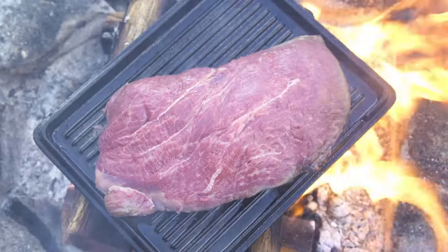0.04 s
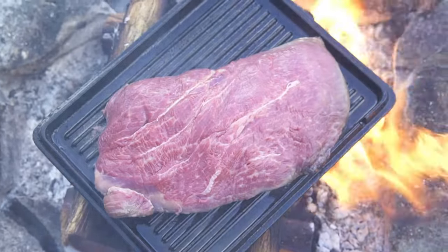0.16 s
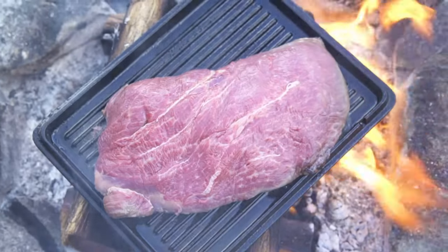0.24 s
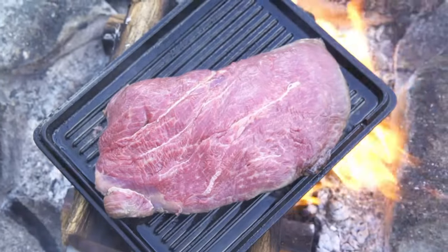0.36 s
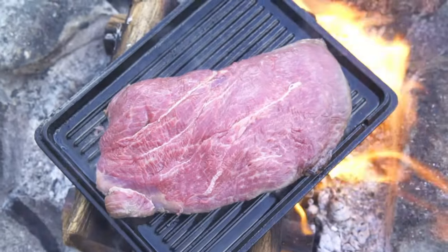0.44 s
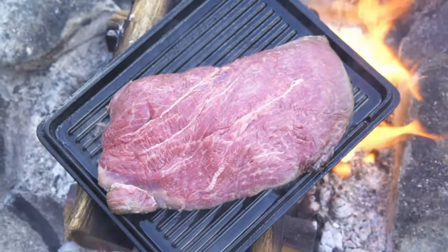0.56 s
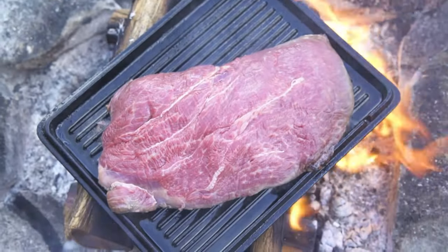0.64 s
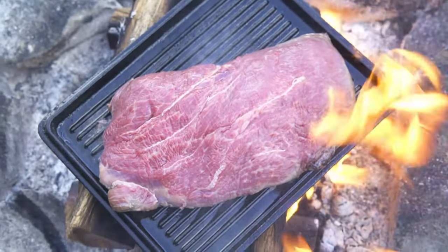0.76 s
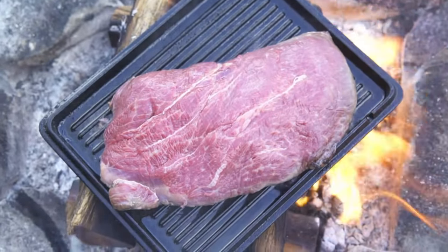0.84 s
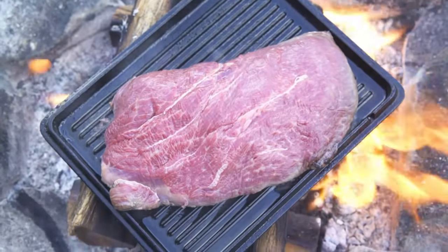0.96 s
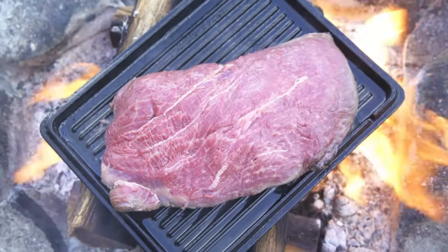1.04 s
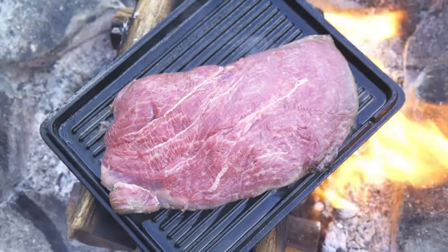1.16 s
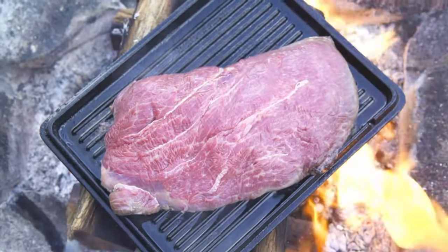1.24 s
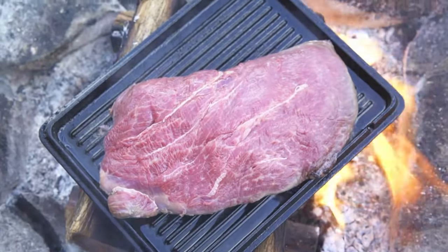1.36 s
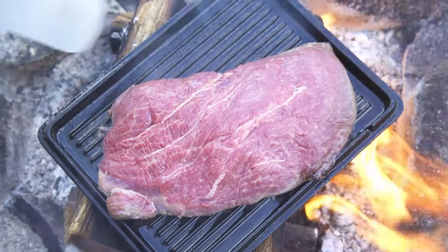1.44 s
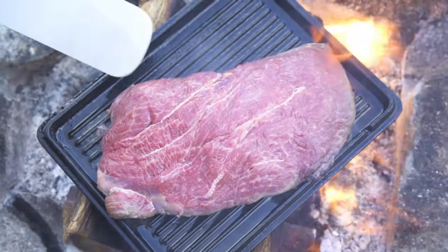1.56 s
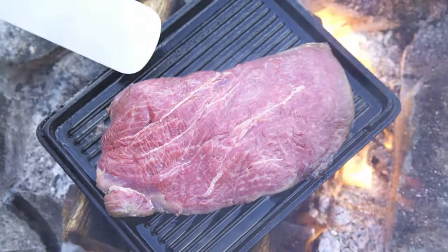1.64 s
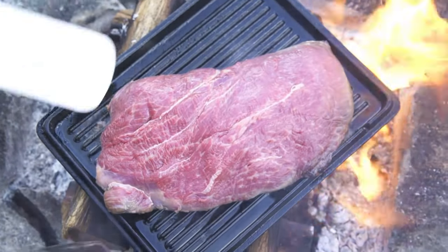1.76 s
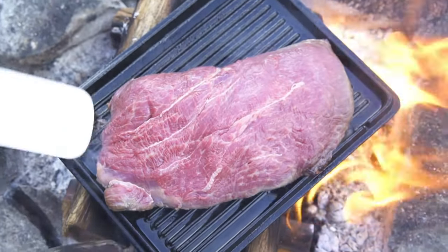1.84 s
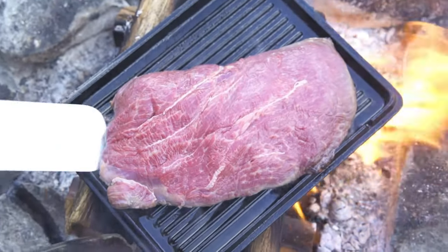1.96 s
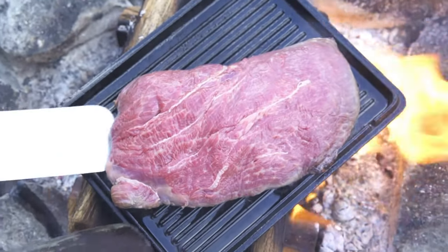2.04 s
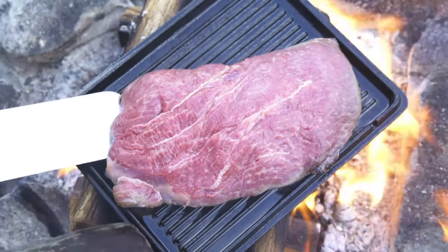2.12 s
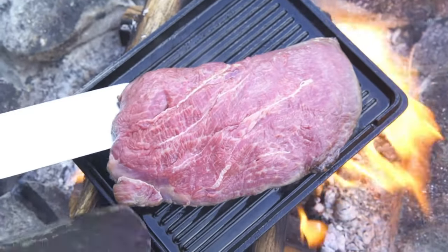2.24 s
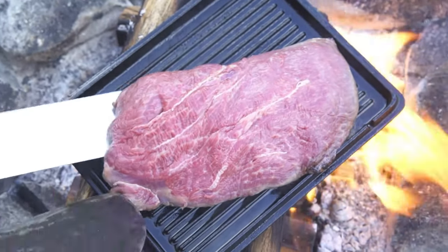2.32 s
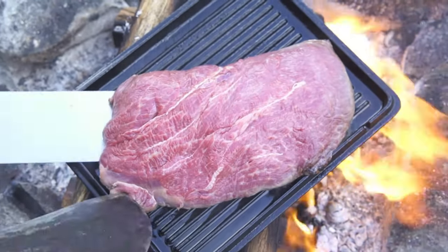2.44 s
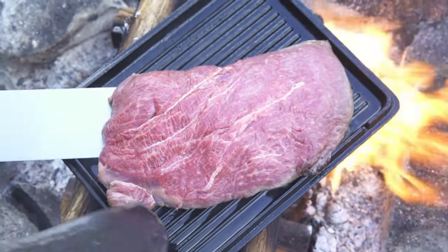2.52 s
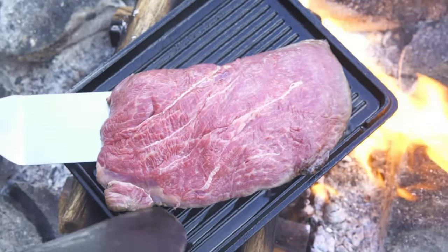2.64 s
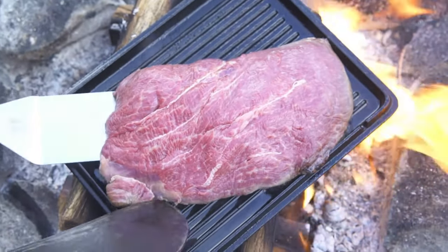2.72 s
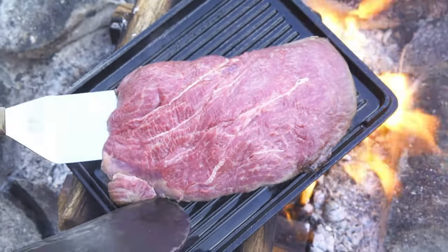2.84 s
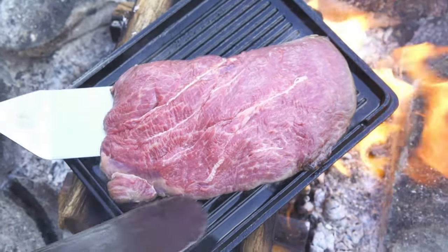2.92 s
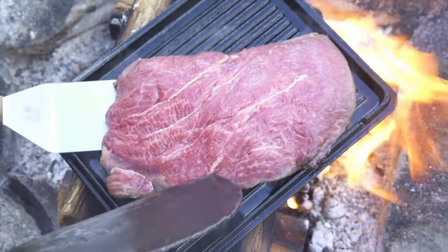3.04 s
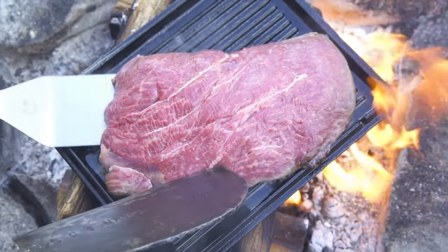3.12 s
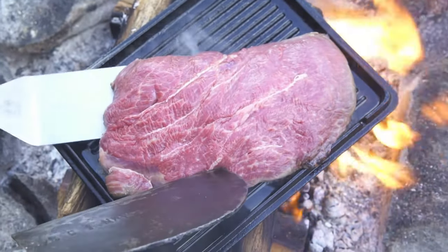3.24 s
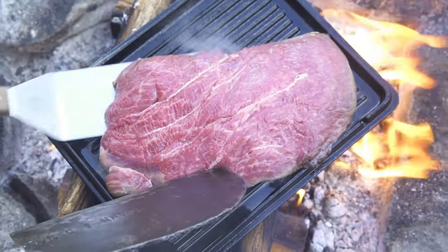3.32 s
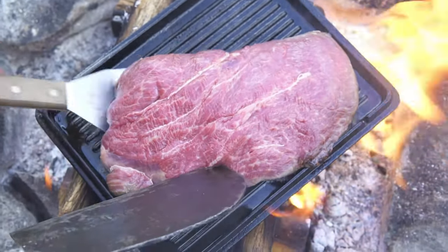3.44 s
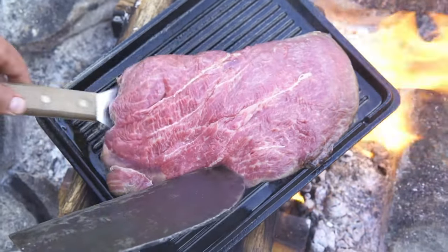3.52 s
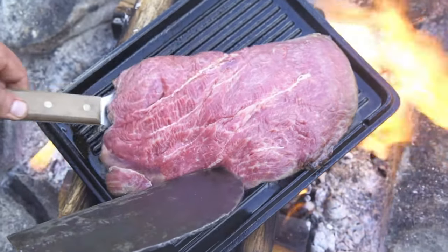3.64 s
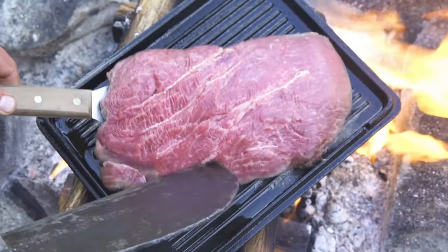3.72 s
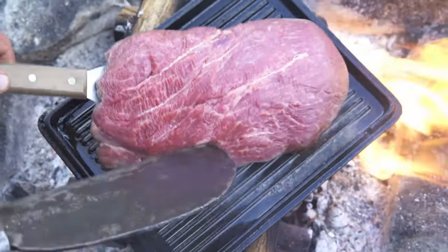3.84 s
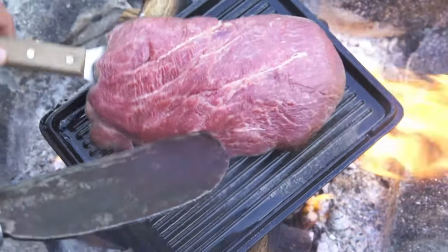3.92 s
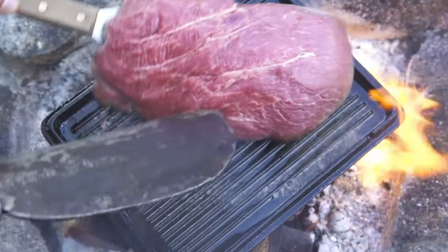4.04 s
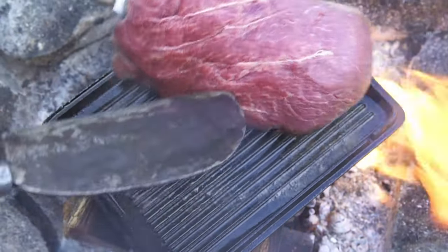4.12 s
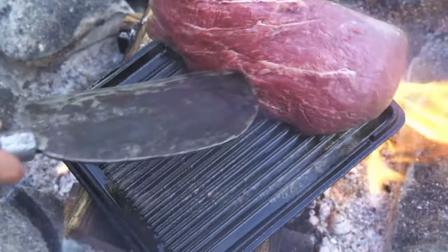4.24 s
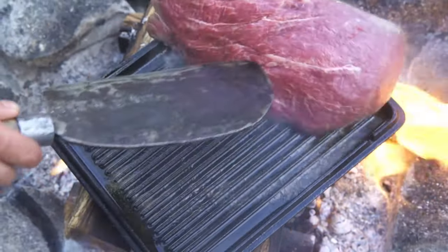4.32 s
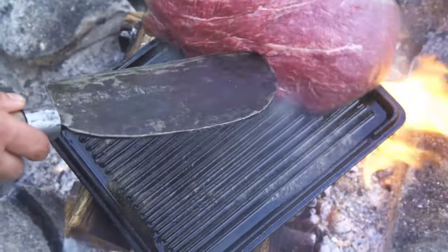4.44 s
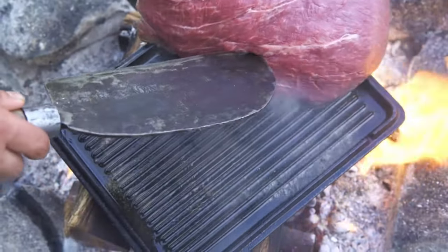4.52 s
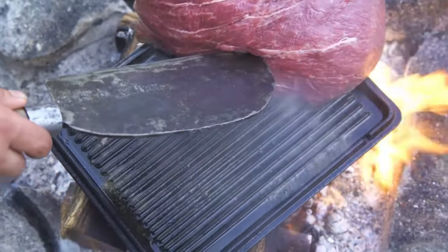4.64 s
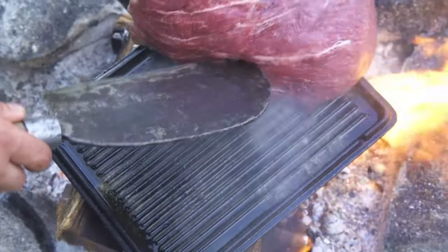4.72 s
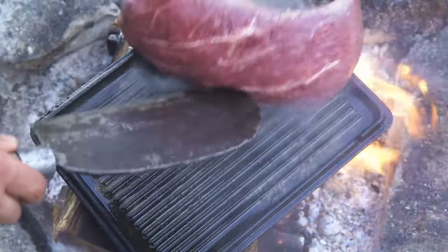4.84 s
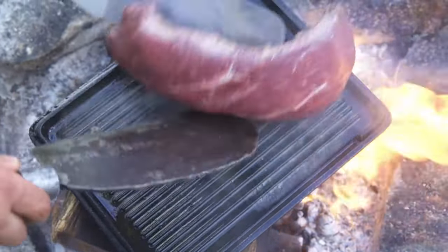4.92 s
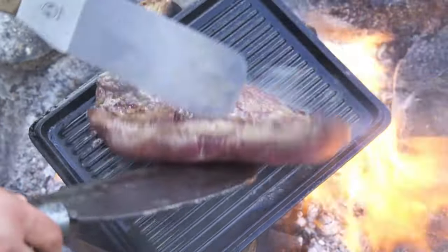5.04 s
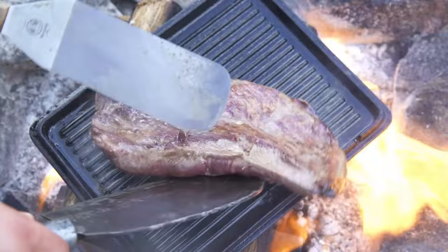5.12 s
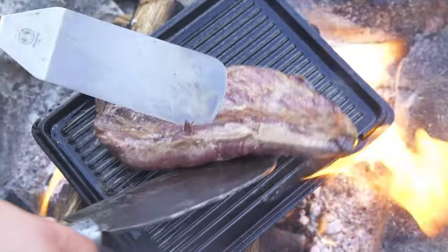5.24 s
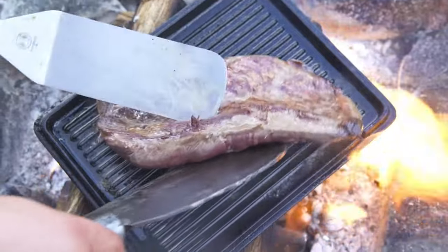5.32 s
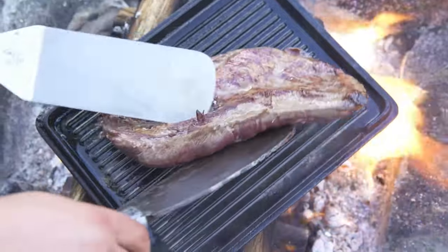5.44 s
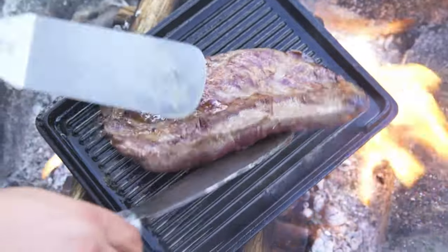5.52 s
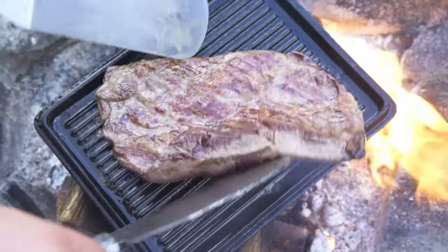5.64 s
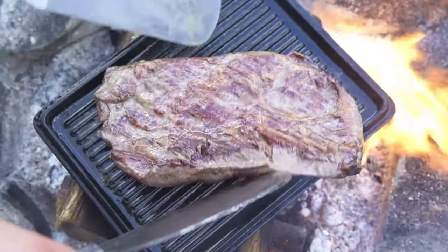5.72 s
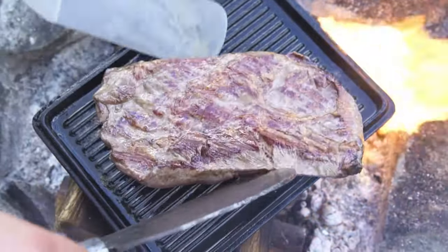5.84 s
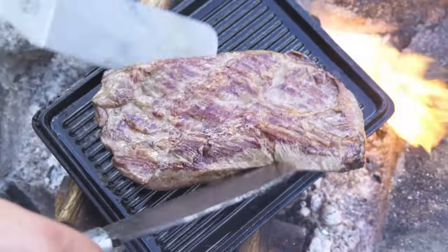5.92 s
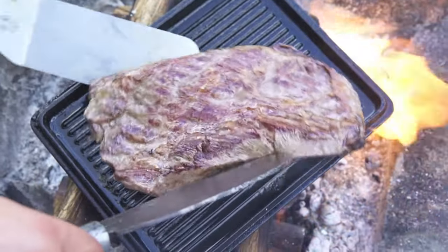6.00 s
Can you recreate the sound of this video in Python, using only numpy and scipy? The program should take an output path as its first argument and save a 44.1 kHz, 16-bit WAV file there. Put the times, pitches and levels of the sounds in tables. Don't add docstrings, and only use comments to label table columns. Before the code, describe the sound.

A close microphone in open air catches crisp frying: fine crackle, hissing spray and loud single spits over a soft, lumpy fire rumble. Soft wooden and metallic knocks lead to a gritty spatula scrape and a ringing tap, then a quick blade clatter and slide. After one especially loud pop, the turned meat hisses harder with short steam jets, and a second blade squeals faintly at the end.

```python
import sys
import numpy as np
from scipy import signal
from scipy.fft import rfft, irfft, next_fast_len
from scipy.io import wavfile
from scipy.ndimage import uniform_filter1d, map_coordinates

SR = 44100
rng = np.random.default_rng(int(sys.argv[2]) if len(sys.argv) > 2 else 0)


def pcm_store(signal):
    levels = np.round(np.clip(np.atleast_2d(signal), -1, 1) * 32767)
    wavfile.write(sys.argv[1], SR, levels.astype(np.int16).T)


def amplitude_ratio(level_db):
    exponent = np.asarray(level_db, float) / 20
    return 10 ** exponent


N = 267642

# (time [s], graininess [0-1], small-bubble pitch [Hz])
GRAIN = [(0, 0.92, 6700), (.8, 0.94, 6760), (1.3, 0.94, 6940), (1.7, 0.76, 6700), (1.9, 0.86, 6700),
         (3.2, 0.79, 6800), (3.9, 0.8, 7040), (4.3, 1, 7040), (4.75, 0.58, 8100), (5.1, 0.62, 6700),
         (5.4, 0.48, 7500), (5.8, 0.44, 6900), (6.07, 0.7, 6700)]


def unit(x):
    return x / np.sqrt(np.mean(x ** 2) + 1e-20)


def curves(rows):
    s, *cols = np.transpose(rows)
    return [np.interp(np.arange(N) / SR, s, c) for c in cols]


def wobble(rate):
    knots = rng.standard_normal(N // 200)
    return map_coordinates(knots, [np.arange(N) * min(rate, 200) / SR])


def filtered(x, response):
    m = next_fast_len(N + SR // 2)
    return irfft(rfft(x, m) * response(np.fft.rfftfreq(m, 1 / SR)), m)[:N]


def coloured(x, points):
    f, db = np.transpose(points)
    return unit(filtered(x, lambda hz: amplitude_ratio(np.interp(np.log(hz + 1), np.log(f), db, -120, -120))))


def resonance(modes):
    def response(f):
        return sum((-1) ** k * amplitude_ratio(db) * 1j * f * width / (hz * hz - f * f + 1j * f * width)
                   for k, (hz, width, db) in enumerate(modes))
    return response


def patchy(depth_db):
    z = signal.stft(rng.standard_normal(N + 512), nperseg=512)[2]
    field = rng.standard_normal(z.shape)
    for axis in (0, 1):
        field = uniform_filter1d(field, size=8, axis=axis)
    return signal.istft(z * amplitude_ratio(depth_db * unit(field)), nperseg=512)[1][:N]


def bursts(s, gain, hz, t60, phase, size, attack=2e-5):
    t = np.arange(size) / SR
    decay = gain[:, None] * amplitude_ratio(-60 * t / t60[:, None])
    wave = decay * np.sin(2 * np.pi * hz[:, None] * t + phase[:, None])
    wave = wave * -np.expm1(-t / attack)
    at = np.round(s * SR).astype(int)[:, None] + np.arange(size)
    return np.bincount(at.ravel(), wave.ravel(), N + SR)[:N]


def grains(count, centre_hz, cycles, spread_db):
    u = rng.random((count, 4))
    hz = np.clip(centre_hz * np.exp(0.88 * (u[:, 1] - u[:, 2])), 300, 0.4 * SR)
    size = amplitude_ratio(np.minimum(-np.log(1 - u[:, 3]), 1.4) * spread_db)
    raw = bursts(u[:, 0] * N / SR, size, hz, 4.95 * cycles / hz, 9 * u[:, 2], size=96)
    return unit(signal.lfilter([1, -1.4, 0.7], [1], raw))


def puffs(s, db, t60, top_hz):
    blow = bursts(s, amplitude_ratio(db), 0 * s, t60, np.pi / 2 + 0 * s, size=4000, attack=0.0017)
    return filtered(blow * rng.standard_normal(N), lambda f: 1 / (1 + 1j * f / top_hz) ** 2)


def fire():
    # (time [s], level [dB])
    flames = [(.1, -51), (.36, -53.5), (.68, -46), (.86, -53.5), (1.0, -48.5), (1.27, -42.5), (1.54, -50.5),
              (1.78, -46), (2.02, -53), (2.74, -50.5), (3.4, -53.5), (3.9, -51), (4.45, -46), (5.0, -45),
              (5.5, -44), (6.07, -45)]
    # (time [s], level [dB])
    draught = [(.1, -50.5), (.55, -46.5), (.85, -50), (1.27, -45), (2.6, -45), (3.9, -48), (4.55, -46),
               (5.4, -49.5), (5.8, -49.5), (5.92, -46), (6.05, -53)]
    # (frequency [Hz], level [dB per Hz])
    flutter_spectrum = [(15, -31), (30, -9.5), (70, -2), (130, -2.5), (220, -8.5), (400, -13.5), (700, -18)]
    roar_spectrum = [(90, -41), (200, -6), (400, -4.5), (750, -8.5), (1200, -5), (2000, -5), (3200, -16.5),
                     (6000, -45)]
    (flutter_db,), (roar_db,) = curves(flames), curves(draught)
    flutter = unit(amplitude_ratio(2.25 * wobble(9)) * coloured(patchy(depth_db=0.5), flutter_spectrum))
    embers = grains(count=900, centre_hz=1300, cycles=3.1, spread_db=4)
    roar = coloured(patchy(depth_db=1.5) + 0.22 * embers, roar_spectrum)
    roar = unit(amplitude_ratio(0.72 * wobble(15) + 1.17 * wobble(60)) * roar)
    return amplitude_ratio(flutter_db) * flutter + amplitude_ratio(roar_db) * roar


def knocks():
    # (time [s], peak [dB], pitch [Hz], t60 [s])
    contacts = [(.208, -29, 800, .012), (.231, -34.5, 980, 0.034), (.228, -35, 262, 0.052),
                (.478, -33.5, 326, 0.1), (1.082, -26, 1710, .01), (1.113, -26, 1020, 0.032),
                (1.113, -28.5, 535, 0.022), (1.178, -38, 430, .07), (1.198, -37.5, 424, 0.12),
                (1.263, -34, 564, .03), (1.272, -33, 480, .03), (1.281, -27, 1500, 0.016),
                (1.294, -34, 1050, .03), (1.174, -36, 1000, .04), (1.245, -30.5, 420, 0.049),
                (1.26, -30, 1430, 0.034), (1.273, -31, 900, 0.038), (1.684, -29.5, 305, 0.095),
                (2.328, -15.5, 1880, 0.01), (2.513, -28, 900, .035), (2.513, -30, 1250, .03),
                (2.538, -32, 1150, 0.037), (2.569, -30, 1010, 0.03), (2.569, -32, 420, .04),
                (2.61, -33, 430, 0.035), (2.757, -35, 503, 0.039), (3.114, -33.5, 228, 0.071),
                (3.209, -41, 491, 0.21), (3.965, -49, 174, .08), (4.004, -29.5, 215, 0.044),
                (4.423, -28.5, 423, 0.018), (4.424, -29, 850, .012), (5.348, -36, 700, 0.046),
                (5.638, -34, 1200, .02), (1.114, -32, 760, .02), (4.422, -33, 190, .035),
                (4.441, -27, 1500, .015), (4.463, -32, 520, .02), (1.11, -36, 298, .03),
                (1.245, -40, 200, 0.055)]
    s, db, hz, t60 = np.transpose(contacts)
    body = bursts(s, amplitude_ratio(db), hz, t60, 0 * s, size=6000, attack=0.00048)
    neighbour = bursts(s, amplitude_ratio(db - 27), 1.4 * hz, 0.44 * t60, 0 * s, size=6000)
    return body + neighbour + puffs(s, db + 2.5, 0.63 * t60, top_hz=900)


def struck(s, db, modes, damping, attack):
    hz, level_db, t60 = np.transpose(modes)
    level_db = level_db + 1.5 * rng.standard_normal(len(hz))
    return bursts(s + 0 * hz, amplitude_ratio(db + level_db), hz, t60 / damping, hz, size=9000, attack=attack)


def pressure(strokes):
    edge_db_per_s = 330
    t = np.arange(N) / SR
    gain = 0
    for touch, lift, db, swell_db in strokes:
        swell = swell_db * np.clip((lift - t) / (lift - touch), 0, 1)
        outside_s = np.maximum(0, np.maximum(touch - t, t - lift))
        gain = gain + amplitude_ratio(db - swell - edge_db_per_s * outside_s)
    return gain


def spatula():
    # (time [s], peak [dB], damping factor [1])
    taps = [
        (2.1055, -20.5, 1.22),
        (2.129, -24, 2),
        (3.434, -32.5, 1.6),
    ]
    # (time [s], peak [dB])
    clash = [
        (3.194, -27),
        (3.1955, -24),
        (3.2, -28),
        (3.205, -35),
        (3.2415, -27),
        (3.244, -29),
        (3.249, -31),
    ]
    # (frequency [Hz], level [dB], t60 [s])
    blade = [(673, -14.5, 0.17), (1195, -7, 0.32), (1374, 0.5, 0.21), (1838, 1, 0.094), (2280, 1, 0.25),
             (2790, -15, 0.15), (3400, -2.5, 0.11), (3750, -17, .1), (4660, -2, 0.086)]
    pair = [(1275, -2, 0.018), (2250, 1, 0.017), (2923, 7, 0.018), (3760, 7, 0.028), (4700, 4, .018),
            (5620, 2, .014), (6700, 4, .012)]
    # (touch [s], lift [s], level at lift [dB], swell along it [dB])
    scrapes = [
        [(1.832, 1.842, -43, -2), (1.856, 1.9, -42.5, 4), (1.91, 1.948, -32, 6)],
        [(2.37, 2.39, -41, 0), (2.525, 2.62, -41, -7.5)],
        [(3.36, 3.603, -42.5, 2.5)],
        [(5.545, 5.555, -46.5, 3), (5.905, 6.005, -42.5, -0.5)],
    ]
    # (frequency [Hz], width [Hz], level [dB])
    drag = [(800, 33, -2.5), (1390, 62, -2.5), (1880, 25, -1), (2200, 60, 4), (2900, 46, -2.5),
            (3180, 68, 2), (3870, 60, -3), (4170, 50, -17), (4860, 53, 2)]
    under = [(433, 180, -2), (1180, 250, 0.5), (1710, 300, -2.5), (2080, 180, 4.5), (2900, 350, -13)]
    slide = [(710, 33, -7), (1200, 47, -3), (1387, 80, -0.5), (1870, 100, 2.5), (2320, 170, -18)]
    knife = [(700, 22, -3.5), (1220, 23, -22), (1820, 38, -3), (2330, 120, -11), (2760, 49, -6)]

    out = sum(struck(s, db - 5.5, blade, damping, attack=0.0016) for s, db, damping in taps)
    out += sum(struck(s, db - 5.5, pair, 0.88, attack=0.0002) for s, db in clash)
    tap_s, tap_db, _ = np.transpose(taps)
    clash_s, clash_db = np.transpose(clash)
    out += puffs(tap_s, tap_db + 4, 0.054 + 0 * tap_s, top_hz=2500)
    out += puffs(clash_s, clash_db + 11, 0.011 + 0 * clash_s, top_hz=6000)

    for strokes, modes, rough in zip(scrapes, (drag, under, slide, knife), (0.1, 0.6, 0.7, 0.2)):
        grit = rng.standard_normal(N) * amplitude_ratio(4.3 * wobble(190))
        rasp = unit(filtered(grit, resonance([(2600, 3800, 0)])))
        ringing = unit(filtered(grit, resonance(modes)))
        out += pressure(strokes) * unit(ringing + rough * rasp)

    squeal_hz, squeal_db = 697, -5
    squeal = np.sin(2 * np.pi * squeal_hz * np.arange(N) / SR + 0.4 * wobble(30))
    return out + pressure(scrapes[-1]) * amplitude_ratio(squeal_db + 1.5 * wobble(40)) * squeal


def jets():
    # (time [s], length [s], pitch [Hz], width [Hz], level [dB])
    gaps = [(0.296, 0.037, 5560, 2500, -35), (3.358, 0.048, 7300, 1500, -33),
            (4.118, 0.024, 7400, 900, -34.5), (4.25, 0.14, 8000, 700, -39), (3.953, .12, 7000, 700, -39.5),
            (4.66, 0.1, 7960, 900, -34), (5.196, 0.048, 3920, 500, -31), (5.255, 0.0089, 8200, 1500, -25.5),
            (5.37, 0.044, 8200, 900, -28.5), (5.424, 0.017, 6200, 1200, -28), (5.5, 0.028, 8250, 800, -34),
            (5.61, 0.033, 6800, 2500, -31.5), (5.658, 0.055, 3900, 700, -31),
            (5.715, 0.027, 5000, 3000, -39), (2.443, 0.18, 9400, 4000, -37.5),
            (3.768, 0.049, 7000, 1500, -37), (1.383, 0.092, 8200, 1200, -44),
            (4.447, 0.089, 8300, 700, -39.5), (5.963, 0.11, 3480, 1000, -36.5)]
    t = np.arange(N) / SR
    sputter = rng.standard_normal(N) * amplitude_ratio(3.0 * wobble(190))
    out = np.zeros(N)
    for s, length, hz, width, db in gaps:
        hiss = unit(filtered(sputter, resonance([(hz, width, 0)])))
        out += amplitude_ratio(db) * np.exp(-((t - s) / length) ** 2) * hiss
    return out


def pops():
    # (time [s], peak [dB], pitch [Hz])
    drops = [(.076, -16.5, 2600), (.5005, -15.5, 4480), (.6127, -14, 5170), (.6725, -13, 4100),
             (.9216, -13, 3900), (1.3461, -14, 4350), (1.5, -14.5, 2200), (1.8262, -10.5, 3930),
             (2.038, -9, 3640), (2.015, -16, 3000), (2.0992, -20, 4330), (2.3792, -9, 4320),
             (2.6027, -10, 4540), (2.6232, -9.5, 4320), (2.6446, -12.5, 3270), (2.7965, -10, 4750),
             (2.9472, -11, 3660), (3.1953, -11.5, 2760), (3.4477, -12.5, 3440), (3.8558, -11, 3270),
             (4.12, -12.5, 3450), (4.2624, -12.5, 5300), (4.5749, -5, 4330), (4.5749, -12, 5300),
             (4.151, -19, 3000), (4.2003, -15, 3600), (4.302, -16, 4000), (4.385, -20, 2800),
             (4.425, -15, 3800), (4.435, -19, 3500), (4.465, -14, 3400), (4.503, -17, 2800),
             (4.28, -15.5, 4600), (1.8275, -13, 7600), (1.8555, -21, 4700), (3.944, -18, 4300),
             (1.0302, -15, 5200), (.866, -22, 3500), (.891, -22, 3200), (4.6256, -12.5, 4090),
             (4.8215, -13.5, 4260), (4.896, -13.5, 3750), (5.018, -12.5, 3400), (5.2284, -8.5, 3930),
             (5.713, -12, 3600), (5.857, -13, 3480),
             (.1987, -12, 8500), (.249, -11.5, 6030), (.4113, -15, 7110), (0.505, -13, 8830),
             (0.655, -10, 8400), (.6672, -14, 7840), (.8818, -12.5, 7800), (.896, -12, 7620),
             (1.0055, -13, 7620), (1.03, -13.5, 8740), (1.36, -11.5, 6980), (1.488, -10.5, 8230),
             (2.389, -8, 6500), (2.618, -12, 6100), (2.695, -8.5, 7670), (2.7209, -13, 8010),
             (2.8077, -10, 6060), (2.821, -11, 7940), (3.3434, -12, 6420), (3.4813, -12, 7450),
             (3.5146, -7.5, 7800), (3.669, -11, 6330), (3.711, -7, 6660), (4.078, -11, 7880),
             (4.107, -11, 7400), (4.2796, -17, 7500), (4.4866, -14, 7340), (5.0612, -10.5, 7340),
             (5.3895, -7.5, 8480), (.272, -15, 6500),
             (0.08, -26, 11400), (0.0851, -20, 4300), (0.092, -24, 9800), (0.1218, -21, 8300),
               (0.144, -18, 5300), (0.1887, -25, 9300), (0.2085, -17, 11700), (0.244, -17, 5900),
               (0.2793, -19, 6200), (0.2828, -19, 5900), (0.2952, -18, 7100), (0.3577, -21, 4100),
               (0.3691, -17, 7700), (0.3837, -18, 6300), (0.4245, -20, 6200), (0.4285, -20, 7600),
               (0.441, -17, 2800), (0.469, -17, 5800), (0.4813, -20, 5900), (0.5339, -18, 7300),
               (0.5376, -15, 9600), (0.5593, -15, 6200), (0.5693, -21, 3800), (0.5975, -16, 6500),
               (0.6026, -15, 6100), (0.6093, -16, 8400), (0.6345, -17, 7100), (0.6943, -16.5, 2200),
               (0.7433, -21, 4500), (0.7567, -16.5, 8000), (0.7616, -20, 7700), (0.8165, -17, 4500),
               (0.8277, -17, 5900), (0.8382, -21, 5500), (0.8476, -15, 8100), (0.8873, -21, 8100),
               (0.9074, -16, 7500), (0.9359, -19, 4900), (0.979, -17, 5100), (1.0608, -18, 6800),
               (1.0883, -17, 5600), (1.1088, -20, 7600), (1.1231, -15, 6800), (1.13, -15, 9000),
               (1.1603, -14, 7200), (1.2067, -17, 6500), (1.225, -12.5, 5300), (1.258, -13, 8800),
               (1.2635, -17, 5600), (1.3385, -18, 8600), (1.3565, -20, 4600), (1.3758, -16, 6200),
               (1.3841, -15, 4400), (1.3975, -19, 6200), (1.4332, -12.5, 7300), (1.4794, -13, 7800),
               (1.517, -14.5, 9600), (1.6182, -20, 7800), (1.6469, -19, 6300), (1.685, -18, 7500),
             (1.702, -16, 6800), (1.7073, -16, 6500), (1.7956, -18, 6300), (1.8172, -18, 3100),
              (2.0182, -14, 6900), (2.0438, -14, 4300), (2.0471, -15, 7900), (2.1119, -12, 2100),
              (2.2397, -15, 5300), (2.403, -14, 7900), (2.5413, -11, 4900), (2.5627, -12, 5300),
              (2.6853, -17, 7800), (2.7366, -11, 5700), (2.743, -13, 5100), (2.7483, -18, 6100),
              (2.8352, -24, 7400), (2.8402, -17, 10800), (2.929, -14, 6900), (2.9565, -17, 7200),
              (2.9921, -17, 7100), (3.0449, -13, 7400), (3.278, -20, 13600), (3.3052, -13, 6200),
              (3.3411, -16, 7100), (3.349, -16, 7800), (3.4103, -11, 7800), (3.4694, -13.5, 6800),
              (3.505, -16, 7100), (3.5964, -18, 4800), (3.6568, -17, 7400), (3.6599, -19, 6100),
              (3.7238, -11, 4800), (3.7608, -15, 7800), (3.8062, -13.5, 7300), (3.8667, -20, 3800),
              (3.886, -14, 5200), (3.9237, -19, 8000), (3.9815, -12.5, 5400), (3.9998, -21, 6700),
              (4.0119, -20, 6500), (4.0214, -17, 6300), (4.0887, -16, 7200), (4.1037, -22, 7800),
              (4.1171, -17, 7400), (4.1252, -11.5, 5300), (4.13, -15, 7400), (4.1485, -17, 7500),
              (4.201, -14.5, 7900), (4.2378, -13, 7400), (4.2408, -17, 6700), (4.2546, -16, 5000),
              (4.4355, -19, 10300), (4.457, -19, 8400), (4.4732, -15, 8600), (4.816, -11, 7100),
              (4.9756, -13, 6800), (5.0642, -10.5, 7700), (5.2094, -11, 4100), (5.376, -8, 8100),
             (5.597, -12, 7000), (5.5983, -13, 9000), (5.6035, -15, 6500), (5.616, -14, 8500),
                (5.619, -13, 4500), (5.6265, -15, 7000), (5.643, -15, 7500), (5.647, -15, 3800),
                (5.656, -13, 8500), (5.665, -6, 6800), (5.686, -12, 4500), (5.7183, -11, 4200),
                (5.7232, -16, 8000), (5.735, -19, 12500)]
    # (frequency [Hz], level [dB per Hz])
    fizz_spectrum = [(1500, -22), (3500, -0.5), (7000, 0.5), (11000, -8), (16000, -18)]
    s, db, hz = np.transpose(drops)
    u = rng.random((len(s), 3))
    ring_t60 = 0.00154 + 0.00039 * u[:, 2] + 0.0001 * (db + 14.0)
    ring = bursts(s, amplitude_ratio(db + 2.5), hz, ring_t60, 0.66 * u[:, 0], size=300, attack=0.00008)
    crack = bursts(s, amplitude_ratio(db + 3.0), 6500 + 6500 * u[:, 1], 0.00053 + 0 * s, 4.5 + 0 * s, size=60)
    fizz = bursts(s, amplitude_ratio(db - 13.5), 0 * s, 0.009 + 0 * s, np.pi / 2 + 0 * s, size=500, attack=0.00021)
    fizz = fizz * coloured(rng.standard_normal(N), fizz_spectrum)
    return filtered(ring + crack + fizz, lambda f: (1j * f / (1j * f + 1100)) ** 2)


def cover_db():
    lifted_s, lands_s, cover_s = 4.1, 5.5, 0.33
    bare_db, muffled_db = 2, -3.5
    t = np.arange(N) / SR
    lifted, landed = (np.clip((t - s) / cover_s, 0, 1) for s in (lifted_s, lands_s))
    return bare_db * (lifted - landed) + muffled_db * landed


def bubbles(own, share, clump_db):
    share = np.clip(share * curves(GRAIN)[0], 0, 1)
    mix = np.sqrt(share) * unit(own) + np.sqrt(1 - share) * patchy(depth_db=2.0)
    return mix * amplitude_ratio(clump_db)


def sizzle():
    # (time [s], strength [dB], small bubbles over the rest [dB])
    boil = [(.07, -41.5, -2.5), (.18, -46.5, 3), (.3, -39, 0), (.64, -40.5, 1), (.76, -42.5, -3),
            (.9, -38.5, 0), (1.68, -40, 1), (1.88, -34, -2), (2.05, -38, 0), (3.1, -37.5, 1.5),
            (3.35, -34, -1.5), (3.65, -38.5, 3.5), (4.05, -37.5, -1), (4.3, -40.5, 2), (4.5, -36.5, -2),
            (5.3, -33, 0), (5.56, -36, 2), (5.62, -35.5, 4.5), (5.72, -34.5, 0.5), (5.82, -35, -3),
            (6.07, -35, 0)]
    # (frequency [Hz], level [dB per Hz])
    big_spectrum = [(900, -55), (1700, -13), (2600, -6.5), (3900, -1), (5200, -2.5), (7000, -21.5),
                    (9000, -52)]
    small_spectrum = [(3000, -27), (4600, -6.5), (6300, -2.5), (8000, 0), (9800, -5.5), (12000, -10.5),
                      (15000, -37)]
    spray_spectrum = [(6000, -11), (9000, 4.5), (11000, 3.5), (13000, 3), (15500, 1), (17000, -28)]
    big_db, small_db, spray_db = -2, -0.2, -2.3
    boil_db, small_over_db = curves(boil)
    graininess, pitch_hz = curves(GRAIN)
    surge = (0.52 * wobble(20) + 1.26 * wobble(80)) * (0.25 + 0.72 * graininess)
    ticks = grains(count=2600, centre_hz=5300, cycles=0.63, spread_db=6.0)

    big = grains(count=2800, centre_hz=3900, cycles=1.3, spread_db=6.5) + 1.38 * ticks
    big = bubbles(big, share=1.0, clump_db=1.3 * surge)
    small = grains(count=4000, centre_hz=7400, cycles=2.9, spread_db=7.0) + 1.6 * ticks
    small = bubbles(small, share=0.8, clump_db=0.68 * surge)
    spray = grains(count=8000, centre_hz=12000, cycles=2.1, spread_db=5.5) + 0.59 * ticks
    spray = bubbles(spray, share=0.55, clump_db=1.0 * surge)

    high = np.clip((pitch_hz - 6300) / 1600, 0, 1)
    deeper = [(0.79 * hz, db) for hz, db in small_spectrum]
    small = high * coloured(small, small_spectrum) + (1 - high) * coloured(small, deeper)
    small = small * (1 + 0.26 * high * (1 - high))

    out = amplitude_ratio(big_db) * coloured(big, big_spectrum)
    out += amplitude_ratio(small_db + small_over_db) * small
    out += amplitude_ratio(spray_db + cover_db()) * coloured(spray, spray_spectrum)
    return amplitude_ratio(boil_db) * out


def scene():
    return (fire() + knocks() + spatula() + jets() + pops() + sizzle())[None]


def roll_off(x):
    return signal.sosfilt(signal.butter(12, 16990, fs=SR, output="sos"), x)


def record(dry):
    start_s, top_hz = 0.063, 15830
    opened = dry[0] * (np.arange(N) >= start_s * SR)
    heard = filtered(opened, lambda hz: hz < top_hz)
    return roll_off(heard[None])


dry = scene()
out = record(dry)
pcm_store(out)
```